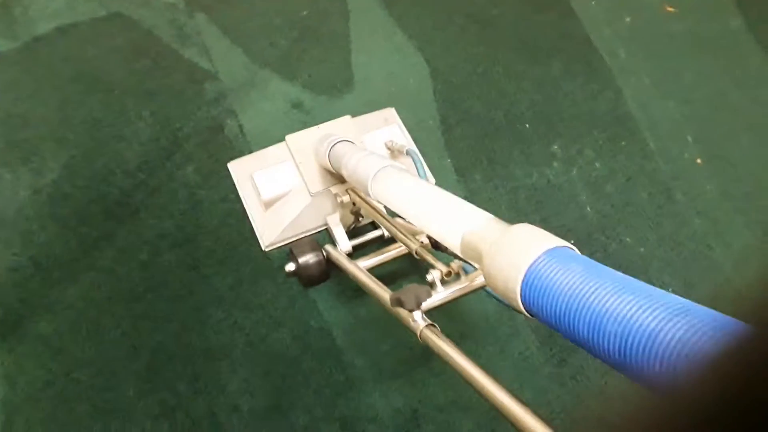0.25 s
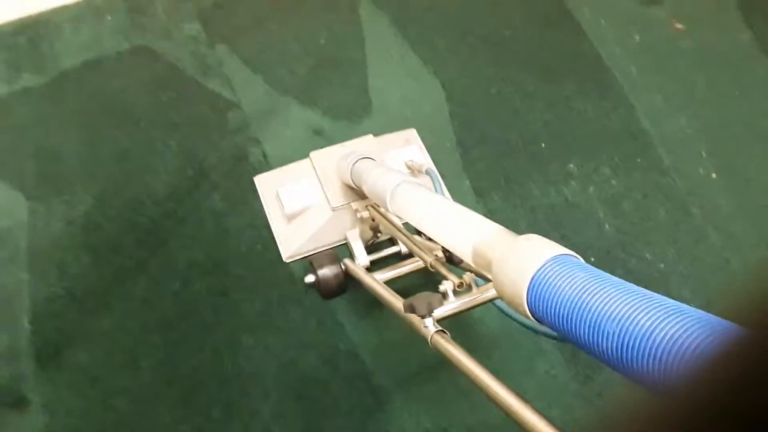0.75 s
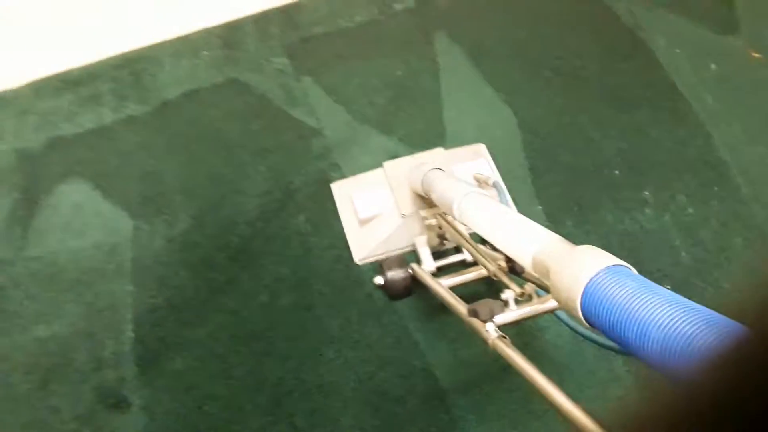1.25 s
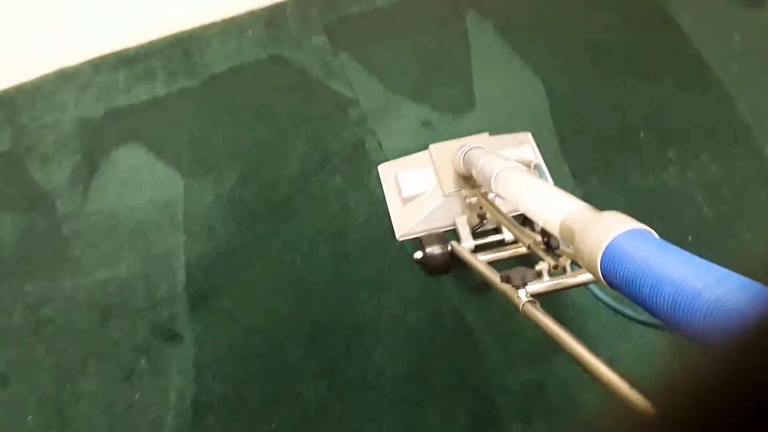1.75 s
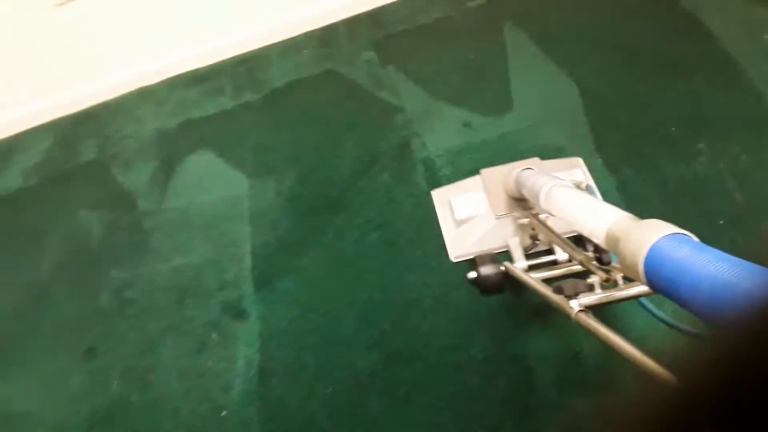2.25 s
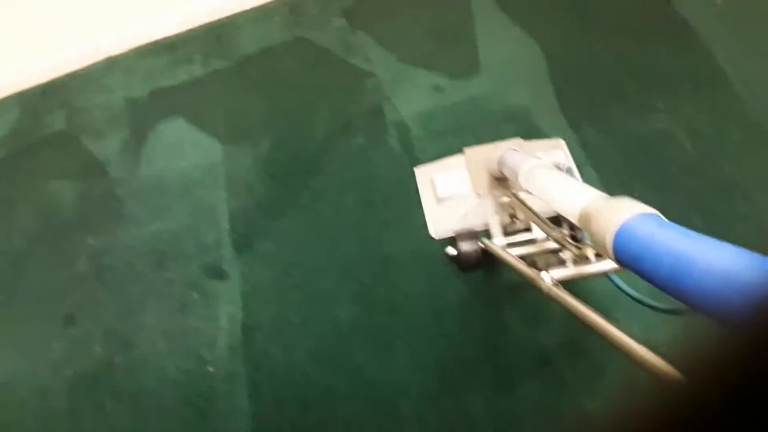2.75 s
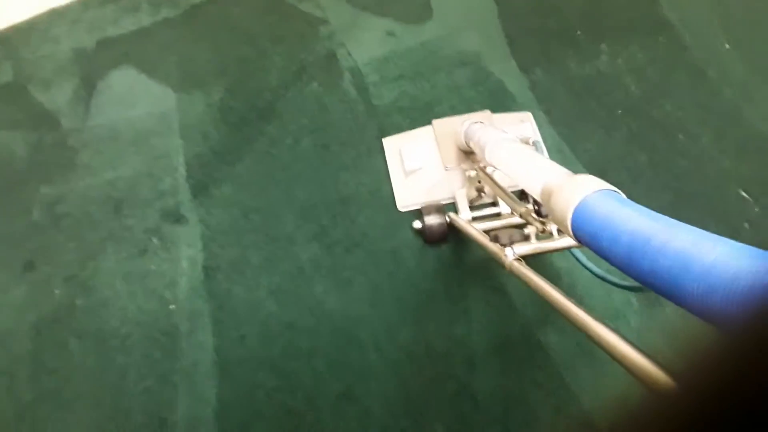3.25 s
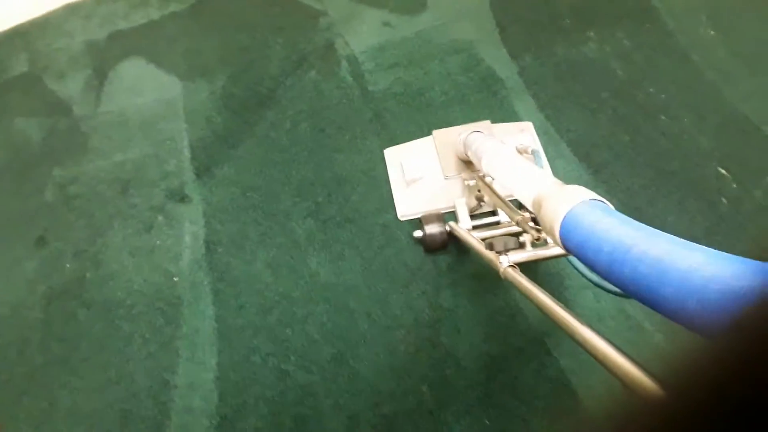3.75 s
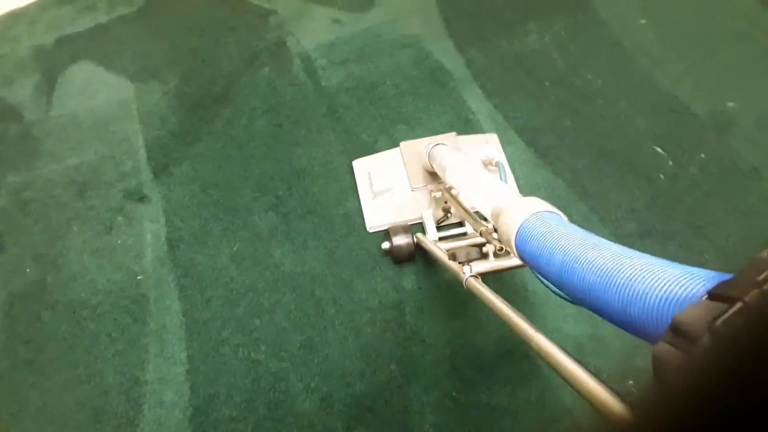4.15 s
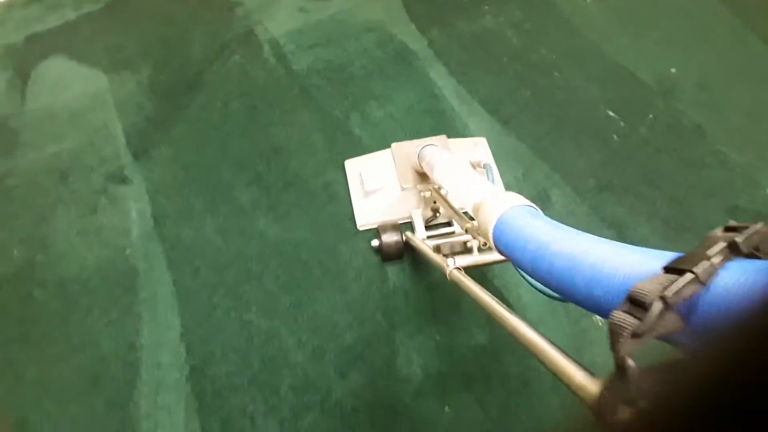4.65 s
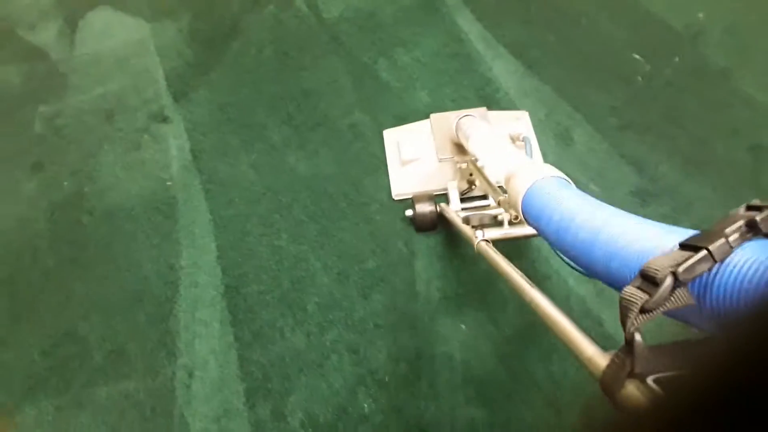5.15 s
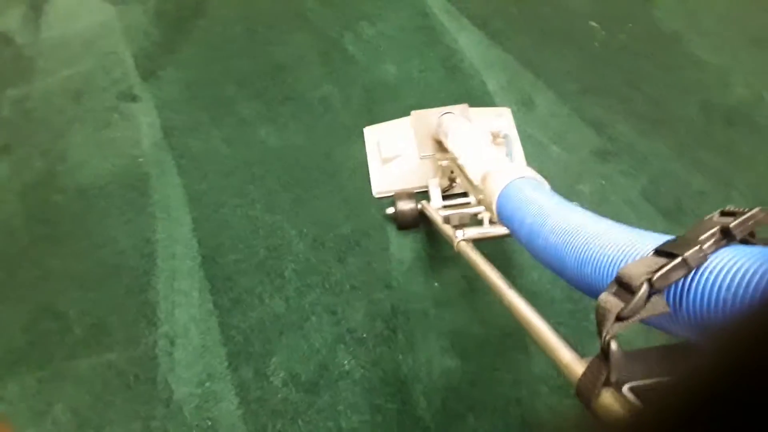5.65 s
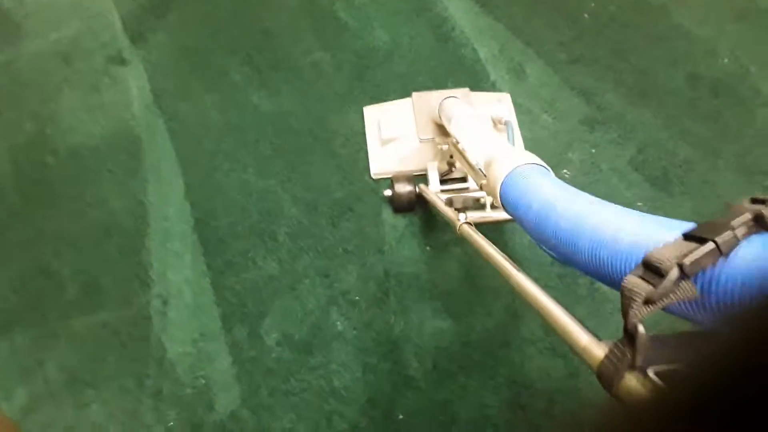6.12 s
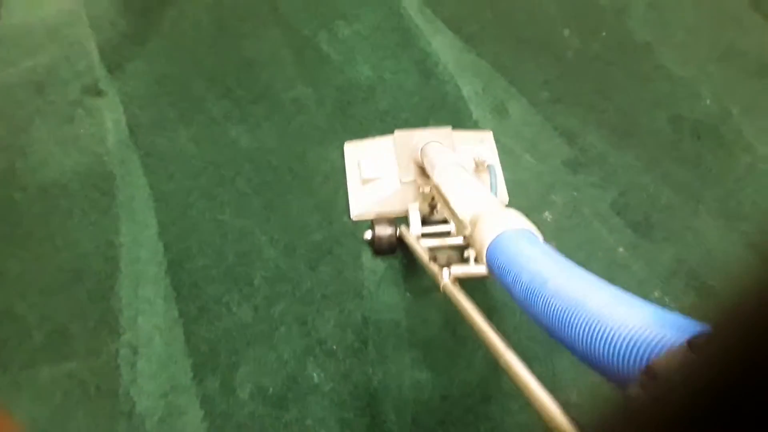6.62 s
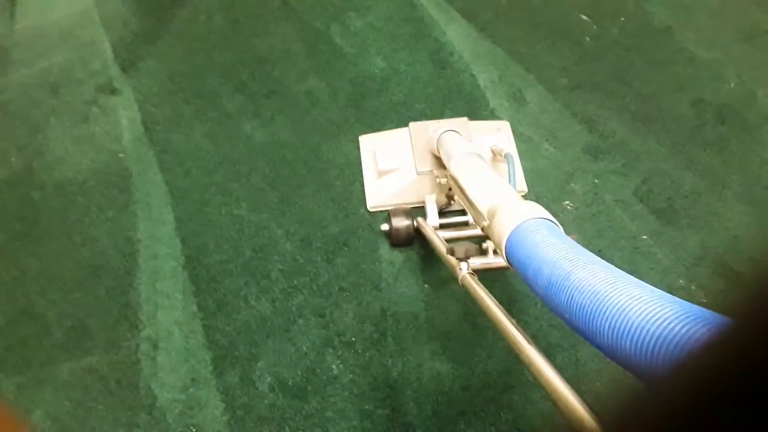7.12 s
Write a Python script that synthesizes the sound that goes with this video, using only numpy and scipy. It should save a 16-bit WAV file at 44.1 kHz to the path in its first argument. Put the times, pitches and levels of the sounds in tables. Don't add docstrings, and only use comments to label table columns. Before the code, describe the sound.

From 0 s a loud, unbroken rush of suction fills the close, nearly mono pickup and lasts to about 7.4 s. Its core is breathy noise ringing around the upper mids from a metal head, with a hollow hose roar beneath and a dense, sharp hiss above, topped by fine water-jet sizzle. Bass is thin; a faint, steady low motor hum and dull rumble sit far behind, swelling and fading slightly. The first second is a little nearer and stronger. From about 2 to 6 s the head seals more tightly, giving a fuller hose tone and less fine spray. Small wet gulps lift the hiss briefly near 0.4, 1.4, 1.6, 3.1, 3.7 and 5.4 s. After about 6.2 s the body softens and the spray sizzle opens, with a quick swell near 6.6 s and light flutters to the end. Short room reflections shift subtly throughout.

```python
import sys
import numpy as np
from scipy import signal
from scipy.fft import rfft, irfft, next_fast_len
from scipy.io import wavfile
from scipy.ndimage import uniform_filter1d, map_coordinates

SR = 44100
rng = np.random.default_rng(int(sys.argv[2]) if len(sys.argv) > 2 else 0)


def to_linear_factor(level_db):
    exponent = np.asarray(level_db, float) / 20
    return 10 ** exponent


def wav_out(sig):
    wavfile.write(sys.argv[1], SR, np.round(np.clip(np.atleast_2d(sig).T, -1, 1) * 32767).astype(np.int16))


N = 325557
TIME = np.arange(N) / SR


def unit(x):
    return x / np.sqrt(np.mean(x ** 2))


def curves(table):
    seconds, *columns = np.transpose(table)
    return [np.interp(TIME, seconds, column) for column in columns]


def walk(rate):
    hold = int(SR / rate)
    steps = np.repeat(rng.standard_normal(N // hold + 1), hold)
    smooth = uniform_filter1d(uniform_filter1d(steps, hold), hold)
    return unit(smooth[:N])


def ring(x, hz, width_hz):
    return signal.lfilter(*signal.iirpeak(hz, hz / width_hz, fs=SR), x)


def ringing_air(hz, width_hz):
    noise = rng.standard_normal(N)
    return unit(ring(ring(noise, hz, width_hz), hz, width_hz))


def high_pass(x, order, hz):
    return signal.sosfilt(signal.butter(order, hz, "high", fs=SR, output="sos"), x)


def turbulence(shape, count, flicker_db, flicker_rate):
    hz, db = np.transpose(shape)
    size = next_fast_len(N)
    pitch = np.log(np.arange(size // 2 + 1) * SR / size + 1)
    colour = to_linear_factor(np.interp(pitch, np.log(hz), db, left=-90, right=-90))
    spectrum = colour * rfft(rng.standard_normal(size))
    centres = np.linspace(np.log(hz[0]), np.log(hz[-1]), count)
    spacing = centres[1] - centres[0]
    out = 0
    for centre in centres:
        share = np.clip(1 - abs(pitch - centre) / spacing, 0, 1)
        out = out + to_linear_factor(flicker_db * walk(flicker_rate)) * irfft(spectrum * share, size)[:N]
    return unit(out)


def machine():
    # time in seconds, level of the fifth multiple in dB, level of the eighth in dB.
    hum_levels = [(0, -49, -51), (.3, -53.5, -51.5), (.8, -54, -63), (1.35, -54.5, -62), (1.7, -49.5, -53),
                  (2.2, -51, -53.5), (2.65, -48.5, -49), (3.05, -49.5, -54), (3.5, -48.5, -48),
                  (4.2, -47.5, -52), (4.6, -48, -47.5), (4.9, -49, -61), (5.15, -53, -51),
                  (5.5, -53, -50.5), (5.82, -55, -59), (6.05, -55.5, -50.5), (6.9, -52.5, -52),
                  (7.38, -52.5, -50)]
    # multiple of the shaft rate, level in dB under the fifth.
    weak_multiples = [(2, -20), (3, -16), (4, -11.5), (6, -5.5), (7, -16), (9, -19), (10, -15)]
    # pitch in Hz, level in dB per Hz.
    rumble_colour = [(12, -14), (30, -16), (65, -21), (90, -5), (130, -2), (160, -4), (230, -23)]
    fifth_db, eighth_db = curves(hum_levels)
    swell_db = fifth_db + 50.5
    shaft_hz = 24.46 * (1 + 0.002 * walk(1.43))
    turn = 2 * np.pi * np.cumsum(shaft_hz) / SR

    lines = [(5, fifth_db + 0.7 * walk(6)), (8, eighth_db + 0.9 * walk(6))]
    lines += [(multiple, db - 51 + 1.1 * walk(3.15)) for multiple, db in weak_multiples]
    hum = 0
    for multiple, db in lines:
        start_angle = 2 * np.pi * rng.random()
        hum = hum + np.sqrt(2) * to_linear_factor(db) * np.sin(multiple * turn + start_angle)

    room_tone = to_linear_factor(-58 + 2.6 * swell_db) * ringing_air(178, 8.1)
    rumble = turbulence(rumble_colour, count=5, flicker_db=0.5, flicker_rate=3.05)
    return hum + room_tone + to_linear_factor(-53.5 + 0.25 * swell_db) * rumble


def part_gains():
    # time in seconds, nearness in dB,
    # seal on the carpet pile in dB, tilt of the mouth towards the microphone in dB.
    stance = [(0, 2.5, -0.2, -.5), (.4, 2.5, -0.7, -1.5), (.8, 2.4, -1, -.5), (1.0, 2.6, -1.1, .7),
              (1.3, 1.05, -0.3, 1.4), (1.7, 2.06, -0.2, -.55), (2.0, 1.2, 1.5, 0.2), (2.35, 0.1, 0.3, 1.2),
              (2.7, -0.1, 0.8, 0.45), (3.15, 0, 0.7, -0.3), (3.4, -0.4, 0.9, -0.4), (4.2, -0.3, 1, -0.35),
              (4.6, -0.1, 1.2, -0.8), (5.2, -0.65, 1.2, -0.4), (5.8, -0.7, .9, 0), (6.3, -1.76, -2, 0.1),
              (6.9, -2, -2.2, 0.4), (7.38, -2.4, -1.5, 0.2)]
    # time in seconds, swell in dB, length in seconds.
    slugs = [(0.058, 0.5, .1), (0.417, 1.2, 0.055), (1.367, 1, 0.069), (1.576, 1.5, .12), (2.116, 0.5, .1),
             (3.13, 2, .12), (3.68, 1.5, .1), (3.9, 1.2, .08), (4.128, 0.5, .2), (4.376, 1.2, 0.12),
             (5.45, 0.9, 0.13), (5.68, 0, 0.051), (6.58, 2.5, 0.054), (6.84, 1.3, .12), (7.043, 1, .08),
             (7.197, 1.2, .08)]
    parts = {"boom": (-45.5, .9, 1, -2.2, -0.2), "roar": (-38, 1.3, 1.06, -0.8, 0.1),
             "column": (-56.5, -1.5, 3, -1.5, -0.5), "shell": (-36, 1.5, 0.84, 0.3, 0.5),
             "body": (-34, 1, 0.9, 1.3, 0.5), "mouth": (-29.5, 1.05, 0.5, 2.1, 1.25),
             "cheeks": (-32.5, 1.77, 1.1, 0.8, 1), "rush": (-28.5, 0.3, 0.35, 1.3, 0.86),
             "hiss": (-29.5, 1.08, -.7, 0.57, 0.38), "jets": (-33, 1.1, -0.66, -0.3, 0.5),
             "mist": (-36.5, 1.4, -2.5, -0.5, 1.1), "air": (-35.5, 0.3, -0.2, .05, .8)}
    near, seal, tilt = curves(stance)
    slug = 0.35 * walk(14)
    for start, swell_db, length in slugs:
        slug = slug + swell_db * np.exp(-4 * ((TIME - start) / length) ** 2)
    gain = {}
    for part, (db, by_near, by_seal, by_tilt, by_slug) in parts.items():
        gain[part] = to_linear_factor(db + by_near * near + by_seal * seal + by_tilt * tilt + by_slug * slug)
    return gain


def hose(gain):
    # pitch in Hz, level in dB per Hz.
    boom_colour = [(150, -17), (215, 2), (270, -2.5), (310, 3.5), (380, -2.5), (450, 3.5), (560, -32)]
    # pitch in Hz, level in dB per Hz.
    roar_colour = [(400, -36), (500, -0.5), (800, -1), (1000, 1.5), (1250, -3), (1450, -15)]
    boom = gain["boom"] * turbulence(boom_colour, count=4, flicker_db=1.3, flicker_rate=4.3)
    roar = gain["roar"] * turbulence(roar_colour, count=4, flicker_db=0.56, flicker_rate=8)
    column = gain["column"] * ringing_air(321, 40)
    return boom + roar + column


def jets(gain):
    # pitch in Hz, level in dB per Hz.
    sizzle_colour = [(9000, -14), (10200, 0), (11800, -1), (12900, -14)]
    # pitch in Hz, level in dB per Hz.
    mist_colour = [(11000, -12), (12300, 0), (13500, -2), (15300, -14)]
    # pitch in Hz, level in dB per Hz.
    air_colour = [(12800, -16), (14400, 0), (15000, -1), (16500, -1.5)]
    sizzle = gain["jets"] * turbulence(sizzle_colour, count=3, flicker_db=0.9, flicker_rate=12)
    mist = gain["mist"] * turbulence(mist_colour, count=3, flicker_db=0.2, flicker_rate=14)
    air = gain["air"] * turbulence(air_colour, count=3, flicker_db=0.8, flicker_rate=11)
    return sizzle + mist + air


def slot(gain):
    # pitch in Hz, level in dB per Hz.
    rush_colour = [(2500, -13), (3600, -0.5), (4500, 0.5), (5500, 0.5), (6500, 1.5), (7200, 1), (8200, -10)]
    # pitch in Hz, level in dB per Hz.
    hiss_colour = [(6300, -19), (7400, 0.5), (8500, 1.5), (9700, -0.5), (11200, -32)]
    rush = gain["rush"] * turbulence(rush_colour, count=4, flicker_db=0.5, flicker_rate=11)
    hiss = gain["hiss"] * turbulence(hiss_colour, count=4, flicker_db=0.6, flicker_rate=13)
    return rush + hiss


def metal(modes):
    out = 0
    for hz, width_hz, db in modes:
        tone = unit(ring(rng.standard_normal(N), hz, width_hz))
        out = out + to_linear_factor(db + 0.71 * walk(10)) * tone
    return unit(out)


def mouth():
    # time in seconds, pitch of the main ring in Hz.
    mouth_pitch = [(0.0, 2649), (1.44, 2645), (3.74, 2716), (5.96, 2693), (6.15, 2730), (6.41, 2668),
                   (7.38, 2752)]
    width_hz = 510
    sway = signal.lfilter(*signal.butter(1, width_hz / 2, fs=SR), rng.standard_normal((2, N)))
    phase = 2 * np.pi * np.cumsum(curves(mouth_pitch)[0]) / SR
    main = unit(sway[0] * np.cos(phase) + sway[1] * np.sin(phase))
    return to_linear_factor(0.92 * walk(12)) * main


def head(gain):
    # pitch in Hz, width in Hz, level in dB.
    body_modes = [(1428, 225, 2), (1860, 420, 3.5)]
    # pitch in Hz, width in Hz, level in dB.
    cheek_modes = [(2210, 570, 0.5), (3280, 750, 0.5)]
    shell = gain["shell"] * metal(body_modes[:1])
    body = gain["body"] * metal(body_modes[1:])
    cheeks = gain["cheeks"] * metal(cheek_modes)
    return high_pass(shell + body + gain["mouth"] * mouth() + cheeks, 4, 160)


def wand():
    gain = part_gains()
    return hose(gain) + jets(gain) + slot(gain) + head(gain)


def room(x):
    # delay in milliseconds, level in dB.
    echoes = [(2.8, -15), (8.4, -15), (10.4, -16), (13.0, -15), (16.5, -17), (22.8, -16)]
    bright = high_pass(x, 2, 1800)
    out = x
    for ms, db in echoes:
        lag = (ms + 0.3014 * walk(0.9)) * SR / 1000
        echo = map_coordinates(bright, [np.arange(N) - lag], order=3, mode="wrap", prefilter=False)
        out = out + to_linear_factor(db) * echo
    return out * to_linear_factor(-0.77)


def scene():
    mono = room(wand()) + machine()
    return np.array([mono, mono])


def stereo_patches():
    # time in seconds, lowest pitch in Hz, highest pitch in Hz, level in dB.
    patches = [(.317, 9600, 14490, -27), (.387, 13740, 15870, -37), (1.32, 10310, 11760, -36),
               (2.805, 13740, 15200, -40), (3.408, 13760, 15180, -42), (3.525, 14430, 15900, -41),
               (3.595, 4190, 5600, -33), (3.618, 6300, 7620, -30), (5.289, 5680, 6920, -33),
               (5.289, 7500, 9600, -23), (6.358, 4220, 5210, -40), (6.358, 11000, 12470, -35),
               (6.613, 4260, 5200, -38), (6.613, 10310, 11780, -38), (6.89, 5660, 6960, -34),
               (6.985, 5710, 6960, -33), (6.985, 14450, 15870, -40)]
    side, size = np.zeros(N), 2048
    block, first = 1024, 879
    hz = np.arange(size // 2 + 1) * SR / size
    for seconds, low_hz, high_hz, db in patches:
        inside = (hz > low_hz) * (hz < high_hz)
        band = irfft(rfft(rng.standard_normal(size)) * inside, size)
        start = first + block * (round((seconds * SR - first) / block) - 1)
        side[start:start + size] += to_linear_factor(db + 1.5) * unit(band) * np.hanning(size)
    return np.array([side, -side])


def low_pass(x):
    return signal.sosfilt(signal.butter(12, 16970, fs=SR, output="sos"), x)


def record(dry):
    port_hz, port_width_hz, port_db, top_hz = 8433, 814, 14, 15730
    ported = dry + (to_linear_factor(port_db) - 1) * ring(dry, port_hz, port_width_hz)
    size = next_fast_len(N)
    hz = np.arange(size // 2 + 1) * SR / size
    cut = irfft(rfft(ported, size) * (hz < top_hz), size)[:, :N]
    return low_pass(cut + stereo_patches())


dry = scene()
out = record(dry)
wav_out(out)
```